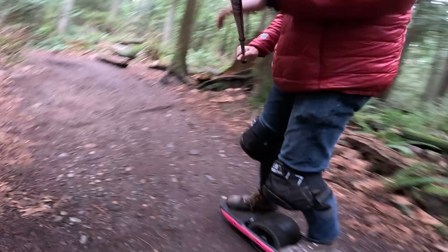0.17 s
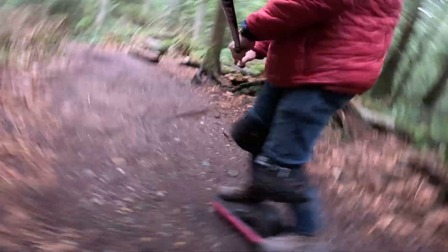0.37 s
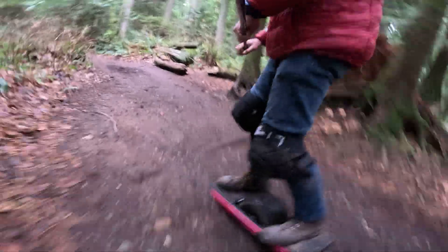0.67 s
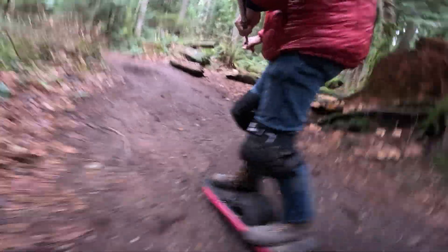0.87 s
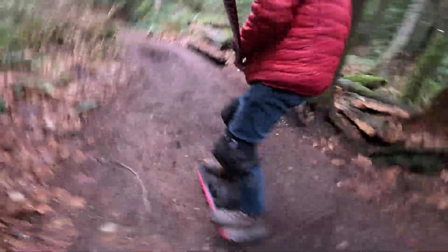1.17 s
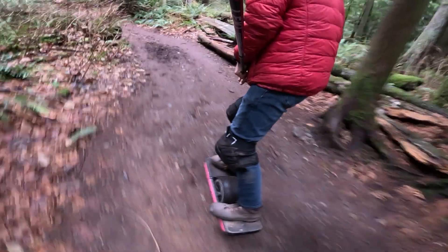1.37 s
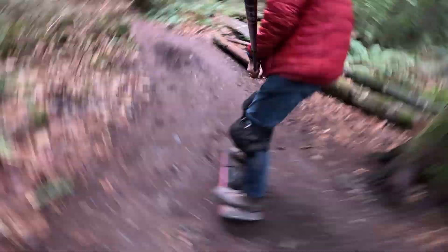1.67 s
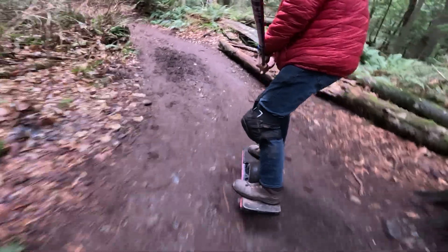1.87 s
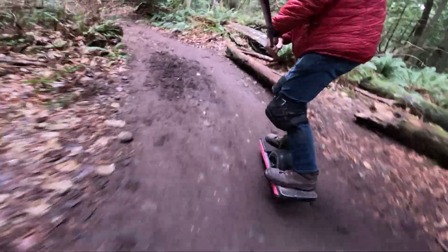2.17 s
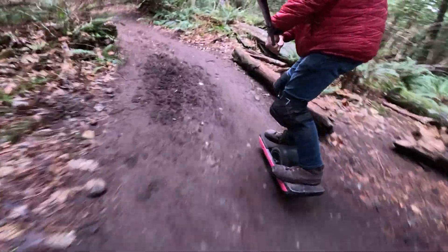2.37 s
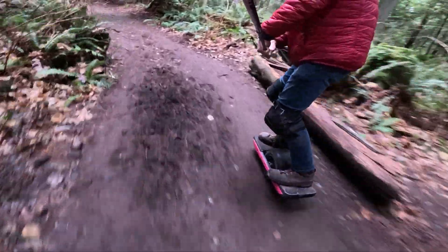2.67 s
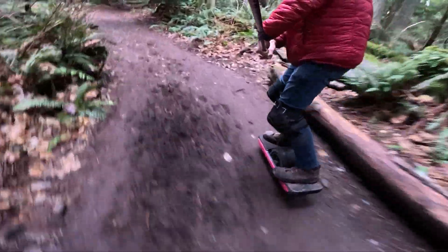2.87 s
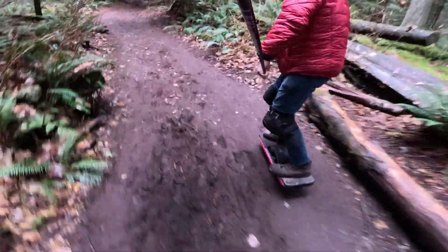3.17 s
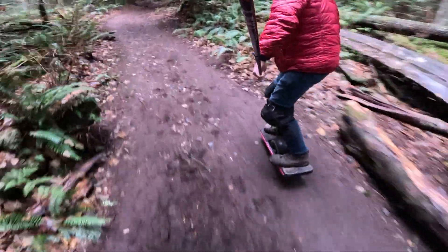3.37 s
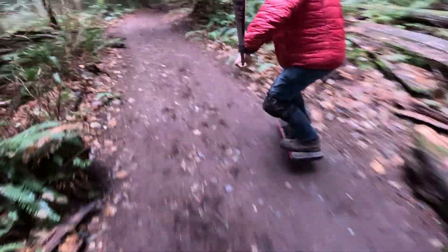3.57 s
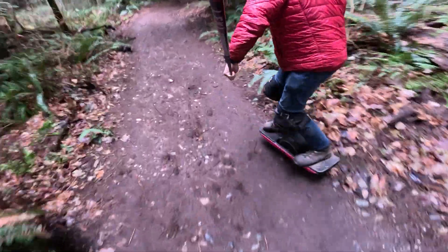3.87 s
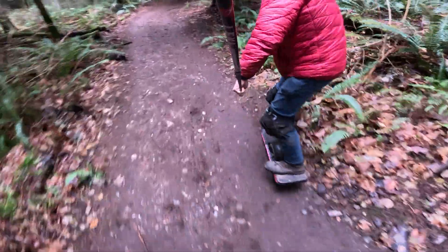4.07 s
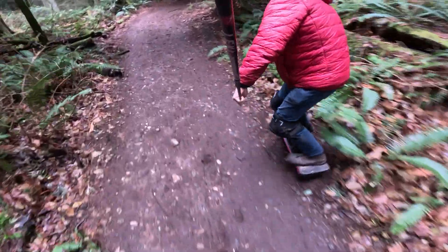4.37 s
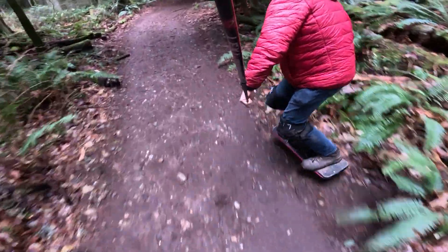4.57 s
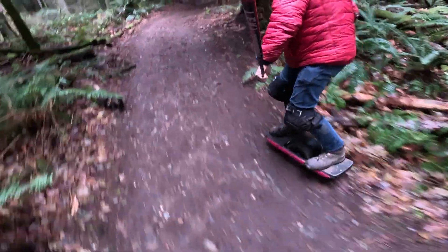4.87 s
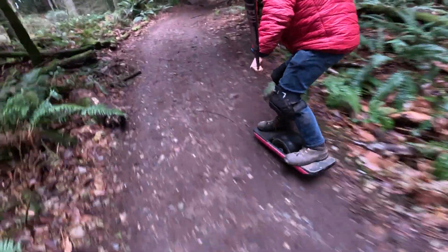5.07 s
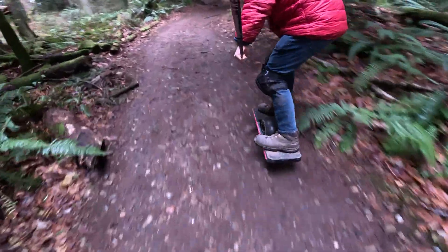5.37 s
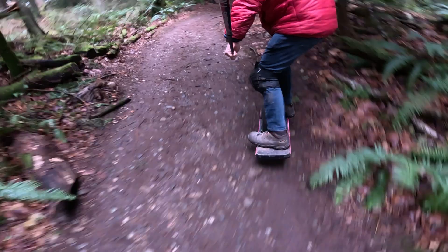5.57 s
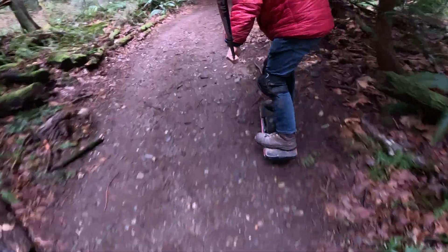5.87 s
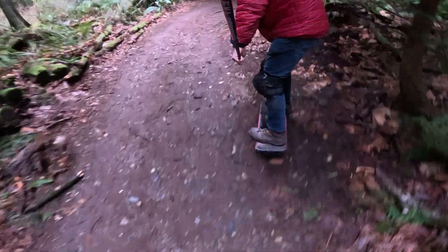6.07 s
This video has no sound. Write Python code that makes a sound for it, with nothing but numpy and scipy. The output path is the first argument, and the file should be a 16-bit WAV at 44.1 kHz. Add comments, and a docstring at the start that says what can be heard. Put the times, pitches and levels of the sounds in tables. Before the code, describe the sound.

Low gusts thump the microphone over a fat tyre rumbling on gritty dirt, a wavering motor hum and scattered snaps and knocks.

```python
"""A one-wheeled electric board rolls along a forest trail, its rider holding the microphone on a pole.
From the start, gusts buffet the microphone, the fat tyre drums and crunches over grit, the motor hums,
and stones and twigs crack under the wheel. Two gusts slap the microphone in the first second, and bumps
begin to knock the board. From about 2 to 4 seconds the tyre hisses through a damp patch.
Near 5 seconds comes the hardest jolt, in a cluster of cracks, and the board rolls on."""
import sys
import numpy as np
from scipy import signal
from scipy.fft import rfft, irfft, next_fast_len
from scipy.io import wavfile
from scipy.ndimage import uniform_filter1d

SR = 44100
rng = np.random.default_rng(int(sys.argv[2]) if len(sys.argv) > 2 else 0)


def digitize_waveform(pressure):
    """Quantize a signal to 16-bit integers and store it at the path in sys.argv[1].

    Rows of a 2-D input are taken as channels; values are limited to [-1, 1].
    """
    field = np.atleast_2d(pressure).T
    bounded = np.clip(field, -1, 1)
    quanta = np.round(bounded * 32767).astype(np.int16)
    wavfile.write(sys.argv[1], SR, quanta)


N = 274302
TIME = np.arange(N) / SR


def from_db(db):
    """Turn decibels into a number to multiply a sound by."""
    return 10 ** (np.asarray(db) / 20)


def unit_power(x):
    """Scale a sound so that its average power is 1."""
    return x / np.sqrt(np.mean(x ** 2) + 1e-20)


def curve(rows):
    """Join (time, value) points with straight lines, giving a value for every sample."""
    return np.interp(TIME, *np.transpose(rows))


def drift(rate_hz):
    """A random wander of about 1 either way; a higher rate wanders faster."""
    hz = np.arange(N // 2 + 1) * SR / N
    return unit_power(irfft(rfft(rng.standard_normal(N)) / (1 + (hz / rate_hz) ** 4), N))


def colour(x, spectrum):
    """Make a sound's lows and highs stronger or weaker, following (pitch, level) points."""
    size = 2 * next_fast_len(N // 2 + SR // 4)
    hz, db = np.transpose(spectrum)
    bins_hz = np.maximum(np.arange(size // 2 + 1) * SR / size, 1)
    roll_off_db = 24 * np.log2(np.maximum(bins_hz / hz[-1], 1))
    gain = unit_power(from_db(np.interp(np.log(bins_hz), np.log(hz), db) - roll_off_db))
    # a minimum-phase filter: it rings after a click, never before
    cepstrum = irfft(np.log(gain))
    cepstrum[1:size // 2] *= 2
    cepstrum[size // 2 + 1:] = 0
    return irfft(rfft(x, size) * np.exp(rfft(cepstrum)))[:N]


def even_out(x, span_s):
    """Hold the power near 1, keeping only flickers quicker than the span."""
    span = max(int(span_s * SR), 2)
    power = uniform_filter1d(uniform_filter1d(x * x, span), span)
    return x / np.sqrt(np.abs(power) + 1e-12)


def resonate(x, hz, width_hz):
    """Make a sound ring at one pitch; a narrower width rings longer."""
    r = np.exp(-np.pi * width_hz / SR)
    feedback = [1, -2 * r * np.cos(2 * np.pi * hz / SR), r * r]
    return signal.lfilter(np.array([1, 0, -1]) * (1 - r * r) / 2, feedback, x)


def grains(per_s, spread_db):
    """Random clicks of very unequal size."""
    sizes = from_db(spread_db * np.minimum(rng.exponential(1, N), 4))
    return unit_power((rng.random(N) < per_s / SR) * sizes * rng.choice([-1, 1], N))


def bursts(times, levels_db, rise_s, decay_s):
    """A loudness shape that jumps up and dies away at each given time."""
    out = np.zeros(N)
    for start_s, db in zip(times, levels_db):
        start = max(int(start_s * SR), 0)
        age = TIME[:min(N - start, SR // 5)]
        shape = (1 - np.exp(-age / rise_s)) ** 2 * np.exp(-age / decay_s)
        out[start:start + len(age)] += from_db(db) * shape / shape.max()
    return out


def spells(starts, holds, levels_db, base_db, rise_s, decay_s):
    """A loudness shape: a base level plus spells that rise, hold and die away."""
    power = from_db(base_db) ** 2
    for start, hold, db in zip(starts, holds, levels_db):
        age = TIME - start
        shape = np.clip(age / rise_s, 0, 1) * np.exp(-np.clip((age - rise_s - hold) / decay_s, 0, 20))
        power = power + (from_db(db) * shape) ** 2
    return np.sqrt(power)


def swells(rows, half_width_s):
    """A loudness shape that rises and falls smoothly around each moment."""
    return from_db(sum(db * np.exp(-np.minimum(((TIME - s) / half_width_s) ** 2, 20)) for s, db in rows))


# gusts at the microphone: start_s, hold_s, buffet_db, flutter_db
GUSTS = [(-0.03, 0.12, -18, -30), (0.389, 0.12, -26, -40), (0.693, 0.033, -21.5, -34),
         (0.84, 0.19, -24.5, -46), (1.146, 0.31, -31.5, -43.5), (1.33, 0.058, -21, -34),
         (1.478, 0.12, -28, -35.5), (1.686, 0.069, -18.5, -31.5), (1.875, 0.12, -27.5, -40),
         (2.656, 0.11, -24.5, -35.5), (2.796, 0.37, -37.5, -39), (3.221, 0.15, -29, -41.5),
         (3.425, 0.057, -23.5, -30), (3.555, 0.23, -22.5, -35.5), (3.845, 0.19, -23.5, -27.5),
         (4.108, 0.075, -22, -31.5), (4.375, 0.27, -31.5, -51), (4.592, 0.03, -25, -34.5),
         (5.474, 0.11, -32.5, -56), (5.835, 0.067, -26.5, -33), (5.978, 0.25, -30.5, -37.5)]
# tone of the deep buffeting and of the lighter flutter: pitch_hz, level_db
BUFFET_TONE = [(10, -3), (22, 5), (40, -0.5), (70, -5), (100, -6.5), (150, -27.5), (250, -40.5)]
FLUTTER_TONE = [(60, -11.5), (110, 3), (210, -1), (300, -15.5), (500, -16), (1000, -43)]


def wind():
    """Big swirls of air push slowly on the microphone; small ones flutter and die away first."""
    starts, holds, buffet_db, flutter_db = np.transpose(GUSTS)
    push = spells(starts, holds, buffet_db, base_db=-42, rise_s=0.01, decay_s=0.1)
    flutter = spells(starts, holds, flutter_db, base_db=-49.5, rise_s=0.01, decay_s=0.036)
    flutter *= from_db(2.52 * drift(37))
    big_swirls = even_out(colour(rng.standard_normal(N), BUFFET_TONE), 0.14)
    small_swirls = even_out(colour(rng.standard_normal(N), FLUTTER_TONE), 0.097)
    return push * big_swirls + flutter * small_swirls


# how rough the ground is under the tyre, wheel and motor: time_s, roughness_db
ROUGHNESS = [(0.0, -29.5), (0.2, -55), (0.41, -40), (0.64, -40), (0.8, -47.5), (1.1, -39), (1.25, -45.5),
             (1.76, -36), (2.42, -51), (3.3, -51), (3.48, -40), (3.83, -50), (4.75, -47.5), (4.98, -35),
             (5.1, -51), (5.22, -40.5), (5.45, -57), (5.72, -40), (5.9, -42.5), (6.22, -49)]


def on_ground(average_db, follows):
    """A loudness shape that follows a share of the changes in the ground's roughness."""
    roughness_db = curve(ROUGHNESS)
    return from_db(average_db + follows * (roughness_db - roughness_db.mean()))


# pitches at which the tyre rings: pitch_hz, width_hz, relative_db
TYRE_RINGS = [(277, 99, -6), (344, 110, -5.5), (420, 110, -3), (471.7, 36, 0.5)]


def tyre_drumming():
    """Countless small bumps beat the rolling tyre like a drum."""
    drum = sum(from_db(db) * resonate(grains(1500, 2.96), hz, width) for hz, width, db in TYRE_RINGS)
    drum = signal.sosfilt(signal.butter(2, [210, 900], "band", fs=SR, output="sos"), drum)
    flicker = from_db(4.1 * drift(10.3))
    return on_ground(average_db=-41, follows=0.73) * even_out(flicker * drum, 0.081)


# pitches at which the wheel rings: pitch_hz, width_hz, relative_db
WHEEL_RINGS = [(691, 13.4, -4), (742, 11.5, -6.5), (955, 25, -19), (1124, 41, -26)]
# tight turns: middle_s, boost_db
TURNS = [(1.52, 10), (2.35, 9.5), (3.46, -1), (4.3, 10.5), (4.63, 6), (5.68, 9)]


def wheel_singing():
    """Small bumps keep the wheel ringing, and it sings out in tight turns."""
    ring = sum(from_db(db) * resonate(rng.standard_normal(N), hz, width) for hz, width, db in WHEEL_RINGS)
    ring = resonate(ring, 440, 700)
    loudness = on_ground(average_db=-53.5, follows=0.48) * swells(TURNS, half_width_s=0.051)
    return loudness * even_out(ring, 0.49)


# the motor's nearly steady note: time_s, pitch_hz
MOTOR_PITCH = [(0, 486), (.22, 475.6), (.41, 492.4), (.57, 476), (.71, 492.6), (.92, 477.3), (1.54, 483),
               (1.65, 497), (1.77, 481), (2.0, 487), (2.31, 468.6), (2.62, 482), (3.45, 483.5),
               (3.85, 478.8), (4.08, 493.5), (4.26, 474.6), (4.52, 489.2), (5.22, 477.6), (5.73, 482),
               (5.86, 492.5), (6.0, 481.5), (6.22, 493)]
# surges that keep the board level: middle_s, boost_db
SURGES = [(.40, 15.5), (.98, 9), (1.17, 7), (1.55, 16.5), (1.66, 8.5), (1.87, 10.5), (2.57, 9.5),
          (2.75, 11.5), (2.97, 8), (3.09, 8.5), (3.45, 9.5), (3.68, 12.5), (4.22, 4), (4.51, 12.5),
          (5.02, 10), (5.32, 10.5), (5.54, 2), (5.72, 12), (6.08, 11.5)]


def motor_hum():
    """The motor in the wheel hums unsteadily, working harder on rough ground and to balance the board."""
    wobble_hz = 6.5 * drift(15.1)
    phase = 2 * np.pi * np.cumsum(curve(MOTOR_PITCH) + wobble_hz) / SR
    effort = on_ground(average_db=-51.5, follows=0.077) * swells(SURGES, half_width_s=0.066)
    flicker = from_db(2.5 * drift(32))
    return effort * even_out(flicker * np.sin(phase), 0.069)


# how much dry grit and damp soil sound along the trail: time_s, relative_db
DRY_GRIT = [(0.0, -36), (0.18, -48), (0.5, -44.5), (1.1, -42), (1.42, -51.5), (1.75, -43), (2.05, -50),
            (3.3, -48), (3.55, -45.5), (4.1, -44.5), (4.7, -54), (4.95, -46.5), (5.5, -55), (5.8, -48),
            (5.96, -55), (6.1, -50.5), (6.22, -49)]
DAMP_SOIL = [(0.0, -54), (1.0, -58.5), (1.2, -51), (1.43, -67.5), (1.7, -59.5), (1.95, -53.5), (2.07, -54),
             (2.13, -47), (2.26, -45), (2.52, -47), (2.75, -41.5), (3.2, -42.5), (3.42, -40), (3.55, -43.5),
             (3.8, -45), (4.1, -52.5), (4.55, -58.5), (4.68, -68.5), (5.1, -56.5), (5.3, -53.5),
             (5.62, -56.5), (5.76, -62.5), (5.94, -65.5), (6.1, -60), (6.22, -62)]
# the tyre scrubs the ground as the rider steers: start_s, hold_s, crunch_db, hiss_db
SCRUBS = [(0.0, 0.014, -34.5, -43.5), (0.778, 0.062, -43, -58), (1.082, 0.031, -40, -56),
          (3.406, 0.055, -42.5, -45), (3.609, 0.12, -47.5, -40.5), (4.522, 0.035, -52, -57),
          (4.911, 0.099, -42, -55.5), (5.139, 0.12, -50.5, -72), (5.665, 0.053, -48, -59),
          (5.782, 0.012, -47, -58), (5.823, 0.012, -49, -55.5)]
# tone of the crunch and of the hiss: pitch_hz, level_db
CRUNCH_TONE = [(400, -7), (800, 2.5), (1400, 0.5), (2000, -2), (3200, -10), (5000, -18.5), (9000, -27.5)]
HISS_TONE = [(1000, -41.5), (1900, -1), (2500, 1), (3800, 2), (4900, -2.5), (5400, -1.5), (6200, -3),
             (7300, -3), (8700, -14), (10200, -16.5), (14500, -33.5)]


def crunch_and_hiss():
    """Dry grit crunches in clumps of ringing grains; damp soil hisses as it peels off the tyre."""
    starts, holds, crunch_db, hiss_db = np.transpose(SCRUBS)
    crunch_level = spells(starts, holds, crunch_db, curve(DRY_GRIT) - 1.3, rise_s=0.017, decay_s=0.0049)
    hiss_level = spells(starts, holds, hiss_db, curve(DAMP_SOIL), rise_s=0.017, decay_s=0.0049)
    grit = sum(resonate(grains(70, 3.63), hz, hz / 6) for hz in np.geomspace(700, 4500, num=12))
    grit = colour(unit_power(grit) + from_db(5) * rng.standard_normal(N), CRUNCH_TONE)
    clumps = drift(22.7)
    crunch = from_db(2 * clumps) * grit
    hiss = from_db(1.35 * clumps) * colour(grains(4500, 1.9), HISS_TONE)
    return crunch_level * even_out(crunch, 0.73) + hiss_level * even_out(hiss, 1.0)


# stones and twigs that crack: start_s, click_relative_db, click_hz, snap_relative_db, snap_hz
CRACKS = [(0.0154, -28, 1390, -53, 4170), (0.04, -26.5, 1070, -66, 3000), (0.42, -33.5, 915, -52, 3000),
          (0.489, -34, 1290, -48.5, 2900), (0.936, -33.5, 1130, -49, 2980), (1.0205, -45, 1900, -49, 3060),
          (1.076, -42, 960, -50, 2400), (1.1072, -34, 1260, -45.5, 2880), (1.7435, -32, 880, -53, 3000),
          (2.2738, -35, 1000, -46.5, 2980), (2.66, -40.5, 1848, -45, 3100), (3.133, -53, 1800, -42.5, 6430),
          (3.6143, -33.5, 2100, -42, 3350), (4.0354, -32.5, 1440, -56, 2000),
          (4.39, -42.5, 2130, -55.5, 2600), (4.4974, -37.5, 1076, -55, 3000),
          (4.904, -39.5, 1001, -62, 2996), (4.926, -38, 1510, -38, 3157), (4.9586, -30.5, 1020, -67, 3000),
          (4.969, -34, 1050, -50, 4500), (4.973, -29, 1500, -34, 2600), (4.9768, -26.5, 930, -39.5, 4000),
          (4.998, -37.5, 1460, -70, 3000), (5.025, -51, 1980, -46.5, 5650),
          (5.3083, -40.5, 1020, -52, 2700), (5.782, -39, 730, -69, 5500), (5.999, -47.5, 1400, -73, 2390)]
# tone of the snaps: pitch_hz, level_db
SNAP_TONE = [(1400, -35), (2200, 5), (3100, 6.5), (4500, 1.5), (7500, 5), (8500, -12), (13000, -67)]


def stones_and_twigs():
    """Each stone or twig gives way under the wheel with a bright snap and a hollow click."""
    snaps, clicks = np.zeros((2, N))
    for start_s, click_db, click_hz, snap_db, snap_hz in CRACKS:
        start = int(start_s * SR)
        age = TIME[:min(N - start, SR // 20)]
        shape = (1 - np.exp(-age / 0.00057)) * np.exp(-age / 0.0034)
        crack, crush = rng.standard_normal((2, len(age))) * shape
        snap = crack + from_db(13) * resonate(crack, snap_hz, width_hz=750)
        click = resonate(resonate(crush, click_hz, 0.35 * click_hz), click_hz, 0.61 * click_hz)
        snaps[start:start + len(age)] += from_db(snap_db - 9) * unit_power(snap)
        clicks[start:start + len(age)] += from_db(click_db - 8.5) * unit_power(click)
    return colour(snaps, SNAP_TONE) + clicks


# pitches at which breaking wood rings: pitch_hz, width_hz, relative_db
WOOD_RINGS = [(890, 91, 7), (1490, 220, 1), (2580, 130, 10), (5400, 120, -2.5)]


def wood_ringing():
    """Each crack leaves the wood ringing briefly; a louder snap gives a louder ring."""
    times, _, _, snap_db, _ = np.transpose(CRACKS)
    breaks = np.zeros(N)
    breaks[((times + 0.002) * SR).astype(int)] = from_db(snap_db - 1.5)
    # each break starts without a hard edge: its highs are softened
    breaks = signal.sosfilt(signal.butter(4, 6000, fs=SR, output="sos"), breaks + 1e-18)
    return sum(from_db(db) * resonate(breaks, hz, width) * SR / (2 * np.pi * width)
               for hz, width, db in WOOD_RINGS)


# the larger pebbles: start_s, level_db
LARGE_PEBBLES = [(1.787, -40), (2.238, -35), (2.407, -34), (2.846, -31.5), (2.927, -33.5), (3.368, -33),
                 (5.343, -37.5), (5.562, -48)]


def pebbles():
    """The tyre squeezes out many small pebbles and a few larger ones, all ringing at two pitches."""
    rise_s, decay_s = 0.0005, 0.0022
    gaps_s, sizes_db = rng.uniform([0.008, -9], [0.06, 0], (170, 2)).T
    times = np.cumsum(gaps_s) % TIME[-1]
    soil_db = np.interp(times, TIME, curve(DAMP_SOIL))
    small = bursts(times, soil_db + 8.5 + sizes_db, rise_s, decay_s)
    large = bursts(*np.transpose(LARGE_PEBBLES), rise_s, decay_s)
    rub = rng.standard_normal(N)
    ring = resonate(rub, 2990, 790) - 0.5 * resonate(rub, 5400, 640)
    return (small + large) * unit_power(ring)


# sudden slaps of wind: start_s, level_db, pitch_hz, length_s
SLAPS = [(0.4, -14.5, 75.7, 0.041), (0.704, -11, 26.5, 0.075)]


def wind_slaps():
    """A sudden gust swings the thin skin inside the microphone a few times: a deep thump."""
    out = np.zeros(N)
    for start_s, db, hz, length_s in SLAPS:
        age = np.maximum(TIME - start_s, 0)
        out += from_db(db) * np.sin(2 * np.pi * hz * age) * np.exp(-(age / length_s) ** 2)
    return out


# bumps that jolt the board: start_s, relative_db, ring_time_factor
BUMPS = [(0.406, -32, 1.4), (1.106, -25.5, 0.68), (1.744, -28, 0.69), (1.869, -27.5, 0.48),
         (3.446, -25.5, 0.83), (3.655, -34.5, 1.1), (4.291, -32, 0.93), (4.9728, -18, 0.48),
         (5.669, -28.5, 1), (5.881, -21, 0.52)]
# pitches at which the board rings: pitch_hz, relative_db, ring_time_s (to fade by 60 dB)
BOARD_RINGS = [(199.4, 9.5, 0.063), (301.5, -5, 0.2), (379, 8, 0.052), (534.7, -8, 0.27), (658, 3, 0.027),
               (888, -5.5, 0.073)]


def board_knocks():
    """Roots and stones jolt the board through the soft tyre; each jolt rings a new mix of its pitches."""
    out = np.zeros(N)
    hz, ring_db, ring_time_s = np.transpose(BOARD_RINGS)[:, :, None]
    for start_s, db, ring_time_factor in BUMPS:
        start = int(start_s * SR)
        age = TIME[:min(N - start, SR // 5)]
        shares = from_db(ring_db + 2 * rng.standard_normal(hz.shape)) * rng.choice([-1, 1], hz.shape)
        rise = 1 - np.exp(-age / 0.00019)
        fade = np.exp(-np.log(1000) * age / (ring_time_factor * ring_time_s))
        rings = unit_power(shares) * np.sin(2 * np.pi * hz * age) * fade
        out[start:start + len(age)] += from_db(db - 0.5) * rise * rings.sum(axis=0)
    return out


def thin_sizzle():
    """A faint, very high sizzle comes with the jolt just after one second and lingers briefly."""
    loudness = spells(starts=[1.08], holds=[0.22], levels_db=[-69.5],
                      base_db=-np.inf, rise_s=0.017, decay_s=0.03)
    pitch_hz, width_hz = 12100, 1400
    sizzle = resonate(rng.standard_normal(N), pitch_hz, width_hz)
    return loudness * unit_power(resonate(sizzle, pitch_hz, width_hz))


# grit hitting the microphone: start_s, relative_db
GRIT_HITS = [(1.107, -40), (4.929, -41), (4.9836, -39), (5.026, -44), (5.223, -32.5), (5.269, -42)]


def grit_ticks():
    """Grit flung against the microphone makes close, bright ticks."""
    hits = bursts(*np.transpose(GRIT_HITS), rise_s=0.00041, decay_s=0.0034) * rng.standard_normal(N)
    rings = (resonate(hits, 5800, 4000)
             + from_db(5) * resonate(hits, 3000, 606)
             + from_db(16) * resonate(hits, 1390, 650))
    return resonate(rings, 2700, 5100)


def scene():
    """Board, trail and wind add up at one microphone."""
    board = tyre_drumming() + wheel_singing() + motor_hum() + board_knocks()
    trail = crunch_and_hiss() + pebbles() + stones_and_twigs() + wood_ringing()
    trail += grit_ticks() + thin_sizzle()
    return (board + trail + wind() + wind_slaps())[None]


def record(dry):
    """Cut away the very highest treble steeply."""
    cutoff_hz = 15200
    return signal.sosfilt(signal.cheby2(12, 60, cutoff_hz, fs=SR, output="sos"), dry)


dry = scene()
out = record(dry)
digitize_waveform(out)
```